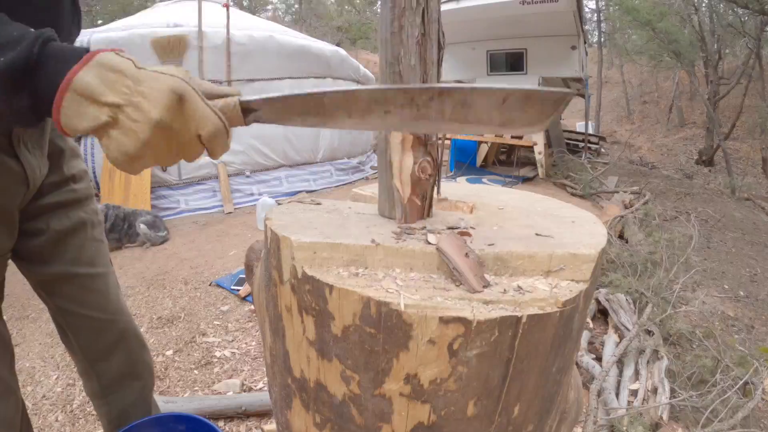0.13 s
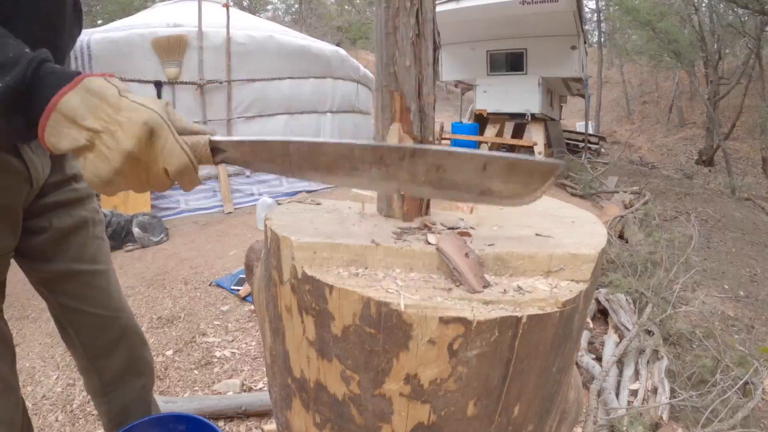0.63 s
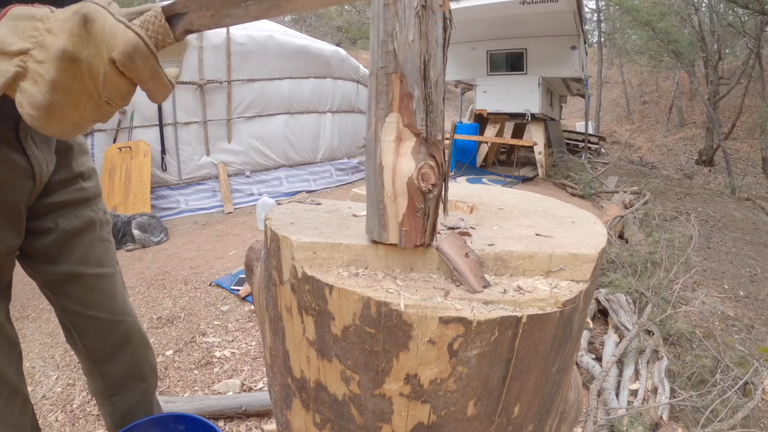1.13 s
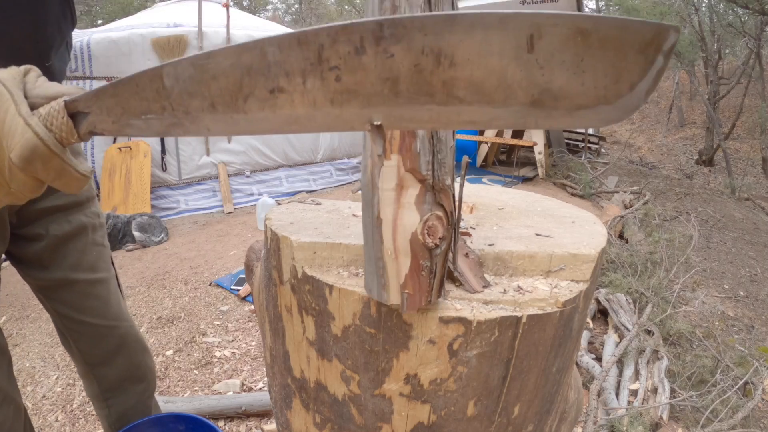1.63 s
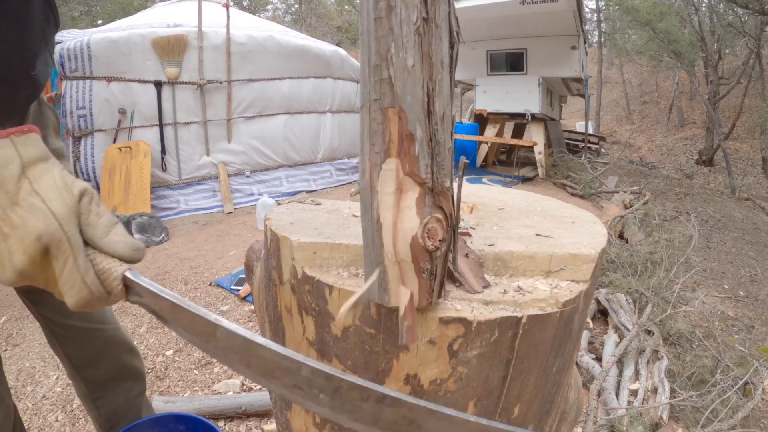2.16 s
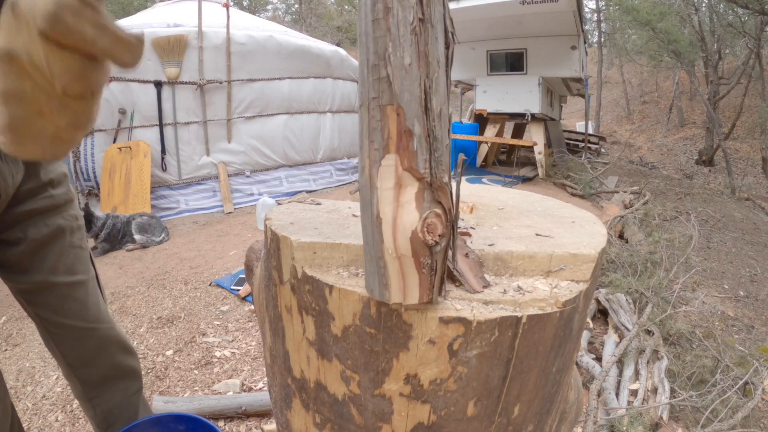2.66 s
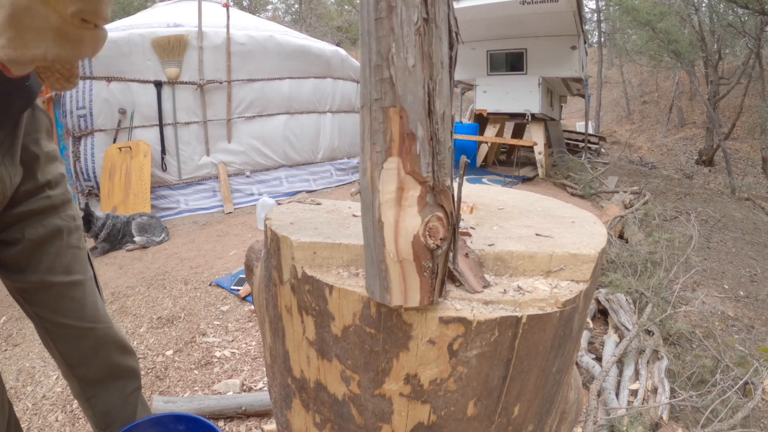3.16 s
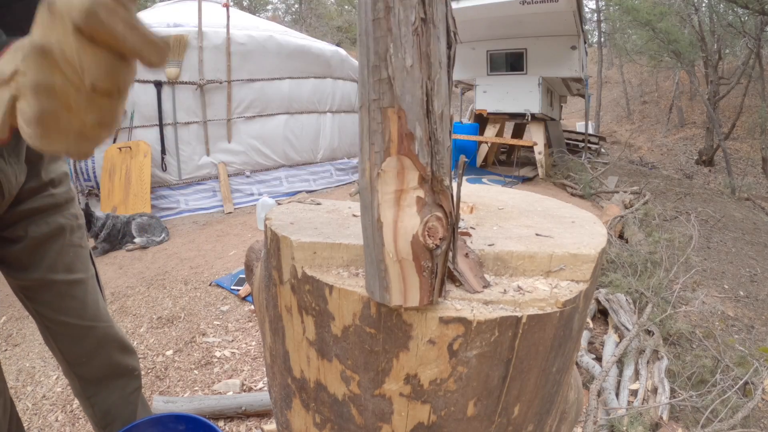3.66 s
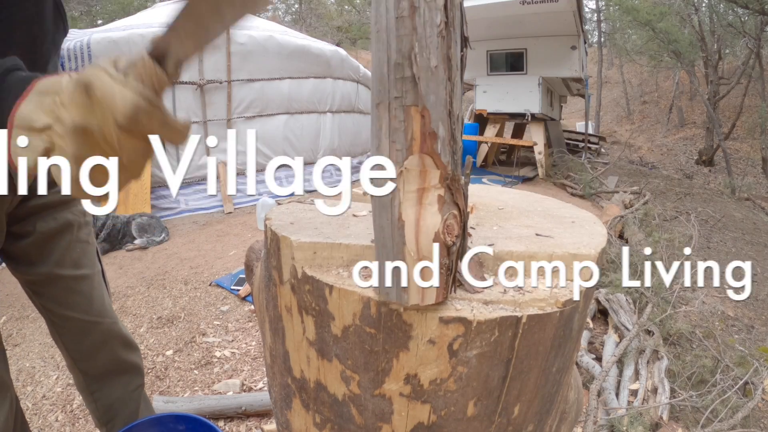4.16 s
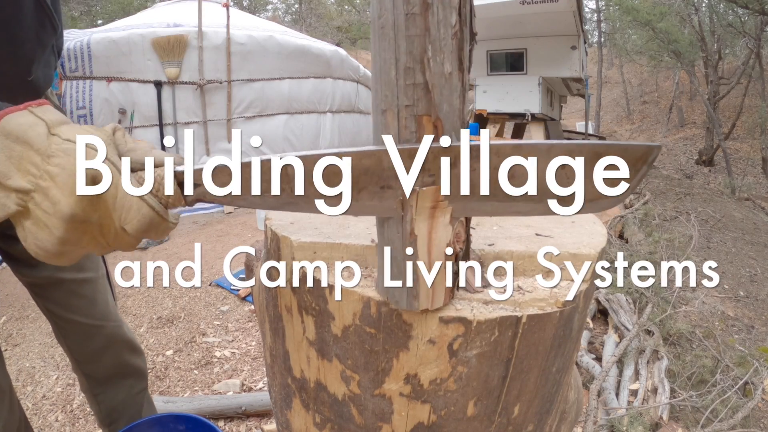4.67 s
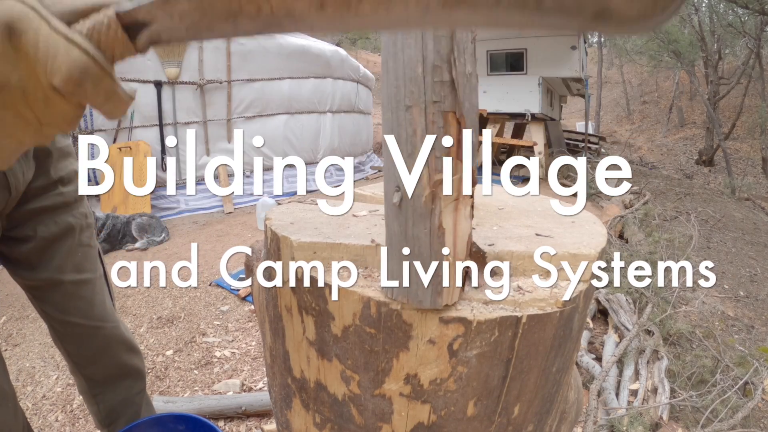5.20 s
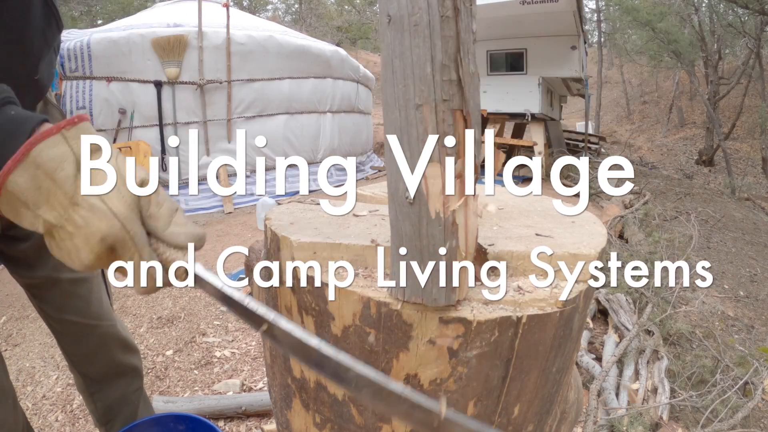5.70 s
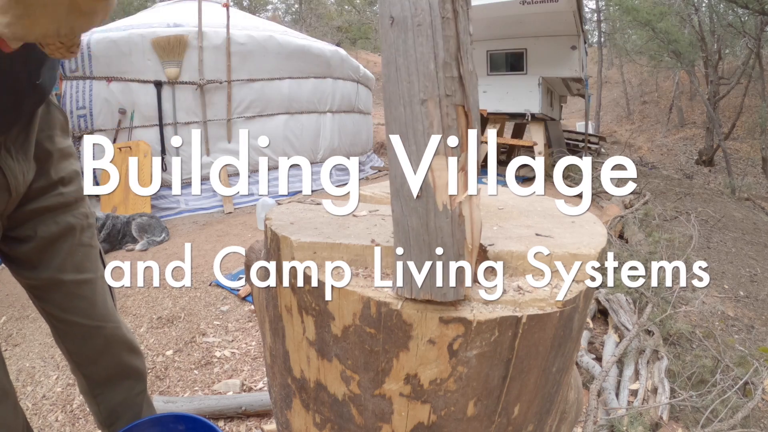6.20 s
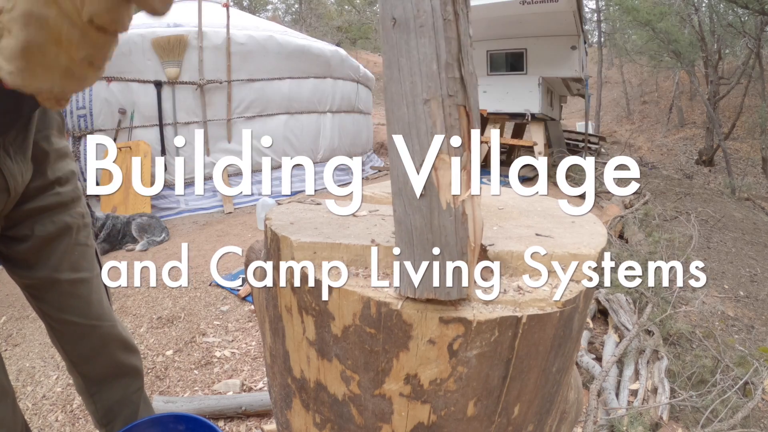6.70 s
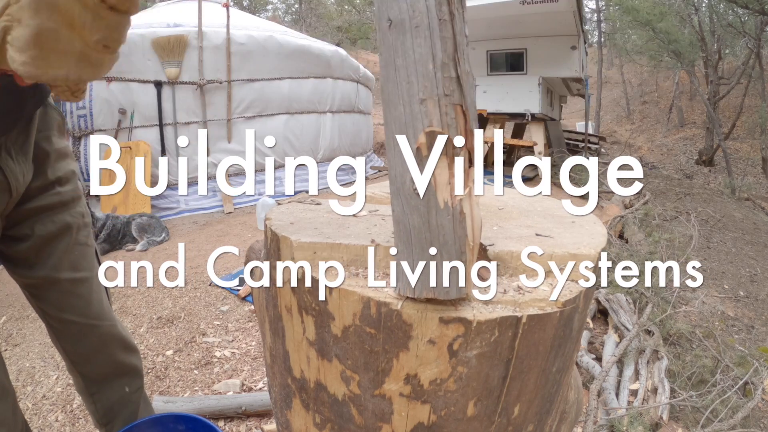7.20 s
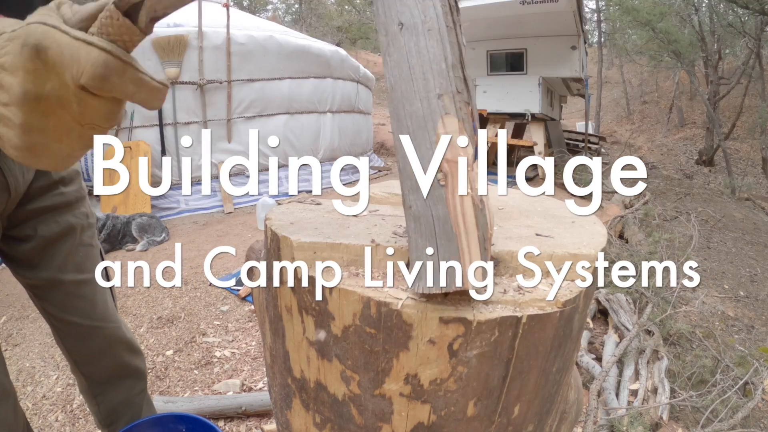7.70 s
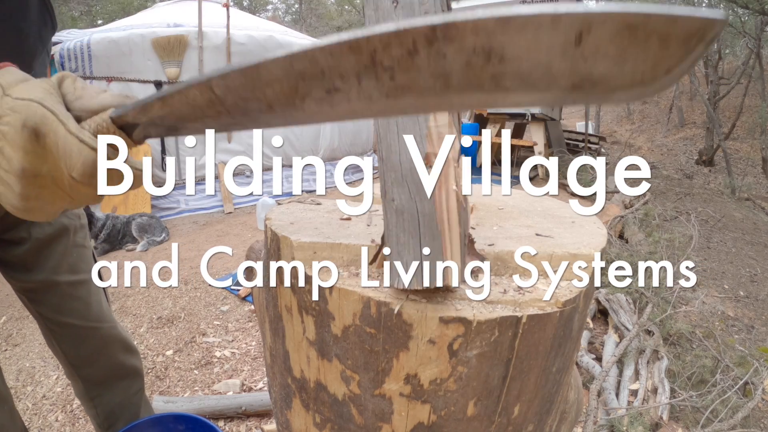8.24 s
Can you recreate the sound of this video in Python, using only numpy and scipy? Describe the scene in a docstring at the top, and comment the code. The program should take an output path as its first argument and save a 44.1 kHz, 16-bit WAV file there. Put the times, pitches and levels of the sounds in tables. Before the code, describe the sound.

Close, irregular machete chops crack into hard wood, chips ticking down between blows, then splintering, a metallic bowl clink and falling debris.

```python
"""First a near-silent moment, then chips tick and bark scrapes: outdoors, close to a small camera with two ports,
a heavy blade chops a small upright log on a stump. Blows ring wood resonances and boom the stump; torn fibres and
soft puffs of sawdust are bursts of spiky noise. Chips patter down, two on a metal bowl (decaying modes); rubbing,
dust and the stuck blade worked loose are grainy noise. Light wind buffets the ports over a quiet forest hush, joined
near 7.75 s by a soft wash of falling debris, all shaped noise."""
import sys
import numpy as np
from scipy import signal
from scipy.fft import rfft, irfft, next_fast_len
from scipy.io import wavfile
from scipy.ndimage import uniform_filter1d, map_coordinates

SR = 44100
rng = np.random.default_rng(int(sys.argv[2]) if len(sys.argv) > 2 else 0)


def linear_from_db(decibels):
    """Turn decibels (scalar or array-like) into linear amplitude factors; 0 gives 1."""
    return 10 ** (np.asarray(decibels, float) / 20)


def transcribe(signal):
    """Save signal, clipped to [-1, 1], as a 16-bit WAV file at the path in sys.argv[1]."""
    frames = np.atleast_2d(signal).T
    limited = np.clip(frames, -1, 1)
    pcm = np.round(limited * 32767).astype(np.int16)
    wavfile.write(sys.argv[1], SR, pcm)


N = 368235

# Wind buffeting at the ports. Each row: time in seconds, level in dB.
WIND = [(.14, -53), (.25, -44.5), (.45, -51.5), (.95, -53), (1.3, -59), (1.5, -49), (2.05, -73), (2.6, -74),
        (3.3, -62), (4.15, -56.5), (4.85, -64.5), (5, -79.5), (5.22, -59.5), (5.45, -74.5), (6.36, -81.5),
        (6.46, -53.5), (6.92, -47.5), (7.4, -66), (7.85, -41.5), (8.2, -50), (8.33, -70)]
# Forest hush all around; near 7.75 s a soft wash of falling debris joins it.
# Each row: time in seconds, level in dB.
HUSH = [(.2, -69.5), (.5, -75.5), (.8, -66.5), (1.2, -76.5), (2.3, -71.5), (3.1, -75), (4.45, -72),
        (4.75, -66), (5, -71.5), (5.9, -69.5), (6.4, -75.5), (7.55, -70.5), (7.75, -52), (8.05, -63)]
# Colour of the buffeting. Each row: frequency in Hz, relative density in dB.
RUMBLE_COLOUR = [(12, -28.5), (22, -5.5), (42, 3), (65, -7.5), (113, -12), (160, -20), (250, -36.5),
                 (500, -120)]
# Colour of the hush. Each row: frequency in Hz, relative density in dB.
HUSH_COLOUR = [(76, -28), (130, -5.5), (269, -5.5), (597, -6.5), (914, -17.5), (2180, -26), (2890, -34),
               (6780, -27), (9000, -28), (11700, -56.5), (19800, -120)]
# What each swing leaves behind. Each row: time of the chop in seconds, draught level in dB, draught length
# in seconds, dust level in dB, fall of the dust in dB per second.
SWINGS = [(0.582, -46.5, 0.17, -56.5, 65.5), (0.997, -50.5, .15, -75.5, 28), (1.605, -52, 0.13, -78, 30.5),
          (2.154, -63.5, 0.15, -52.5, 159), (2.843, -46.5, 0.21, -68, 64.5), (3.376, -48, 0.19, -62.5, 65),
          (3.819, -45, 0.19, -57.5, 83.5), (4.28, -47, 0.21, -62, 21), (5.722, -61.5, 0.12, -46.5, 100.5),
          (6.501, -46, 0.33, -62.5, 62), (7.015, -43.5, 0.15, -69.5, 66), (7.48, -49, 0.2, -50.5, 97)]
# Trees and canvas answering. Each row: frequency in Hz, t60 in seconds.
YARD = [(150, 0.13), (1000, 0.4), (4000, 0.15), (12000, 0.042)]
# Bark scraped, the blade worked loose, cloth, debris sliding. Each row: start in seconds, length in seconds,
# level in dB, brightness in dB (added to the highs, taken from the lows).
SCRAPES = [(.17, 0.28, -67.5, -0.3), (.71, 0.074, -62, -6.5), (2.316, 0.059, -66.5, -7.5),
           (2.435, .27, -74.5, -1.5), (2.928, 0.078, -67.5, -0.5), (3.616, 0.031, -65.5, -5.5),
           (4.12, 0.058, -65.5, -1), (4.466, 0.19, -54, -1.5), (4.674, .22, -56, -3),
           (4.937, 0.05, -78.5, 6), (5.02, .38, -63, -1.05), (5.135, 0.13, -59, 4), (5.891, .14, -66, 5),
           (6.05, .4, -74, 1.5), (7.607, .14, -45.5, -0.5), (7.814, 0.07, -46, -4), (7.977, .06, -63, -3),
           (8.034, 0.18, -58, -4), (8.207, .2, -52.5, 0)]
# Colour of rubbed fibre before the brightness. Each row: frequency in Hz, relative density in dB.
FIBRE_COLOUR = [(410, -41.5), (700, -15.5), (747, -15.5), (1460, -3.5), (2400, -4), (2840, -1.5),
                (6480, -3.5), (7790, -13.5), (12800, -22.5), (16000, -33.5)]
# A split-off piece slides and hums. The row: start in seconds, length in seconds, level in dB,
# frequency in Hz, width in Hz.
SLIDE = (.69, .125, -58, 1370, 280)
# Modes of the metal bowl. Each row: frequency in Hz, level in dB before the hardness, t60 in seconds.
BOWL = [(300.7, -6.5, 0.93), (347, -16, 0.4), (440, -20, 0.3), (876, -7.5, 0.18), (897, -5.5, 0.18),
        (1200, -21, 0.11), (2480, -22, .12), (2820, -10.5, 0.077), (3820, -9, 0.094), (4600, -4, 0.038)]
# Chips landing on the bowl. Each row: time in seconds, level in dB, hardness (modes fade above this Hz).
BOWL_HITS = [(3.625, -46, 545), (7.821, -14, 6170)]
# Chips on other hollow things. Each row: time in seconds, level in dB, frequency in Hz, t60 in seconds.
HOLLOW_NOTES = [(3.514, -49.5, 257, 0.2), (5.93, -51.5, 424, 0.27), (5.93, -53.5, 448, 0.22)]
# The larger chips landing. Each row: time in seconds, peak in dB, centre in Hz.
CHIPS = [(0.1391, -35.5, 4730), (0.189, -16, 4130), (0.2478, -41, 4630), (0.2663, -35.5, 5200),
         (0.3411, -20, 4250), (0.411, -22.5, 8500), (0.683, -35, 1190), (0.7322, -30, 1930),
         (0.9448, -44, 2100), (1.6048, -30.5, 4210), (2.3361, -36, 3490), (2.4399, -34, 2830),
         (2.6199, -34.5, 1760), (3.4674, -27, 3140), (3.5109, -30, 3600), (3.6237, -37.5, 3820),
         (3.636, -40.5, 1500), (3.8786, -31.5, 2960), (3.9554, -34, 3420), (4.0971, -47, 4330),
         (4.119, -45, 4080), (4.1335, -35, 2440), (4.6119, -36.5, 2770), (4.7536, -34.5, 5290),
         (4.8728, -42, 5700), (4.8803, -30.5, 2450), (4.8924, -35.5, 3110), (4.9516, -50, 7040),
         (5.1133, -42.5, 4600), (5.1367, -43, 3080), (5.1984, -34.5, 4110), (5.2719, -35, 4360),
         (5.3747, -35, 4900), (5.4061, -44, 4680), (5.4281, -40, 5090), (5.5672, -46.5, 5300),
         (5.6121, -46.5, 5360), (5.7987, -36.5, 6140), (5.8117, -31.5, 6000), (5.9015, -46, 2790),
         (5.9224, -39, 5960), (5.9289, -26, 5530), (5.9479, -37, 2900), (5.9683, -28.5, 4600),
         (5.9968, -39, 4040), (6.0074, -32, 4720), (6.0591, -41.5, 4120), (6.1594, -48, 3190),
         (6.2108, -49.5, 4710), (6.6737, -41.5, 6970), (6.7635, -36.5, 4200), (6.9536, -42.5, 3080),
         (7.1152, -16, 2960), (7.7867, -26, 2880), (8.0117, -38, 2660), (8.1803, -25, 3400),
         (8.2312, -36.5, 3960)]
# Modes of the blade. Each row: frequency in Hz, level in dB before the hardness, t60 in seconds.
BLADE = [(3420, 3, 0.045), (4360, -4.5, 0.11), (5670, 0.5, 0.063), (15440, -14.5, .07)]
# Cuts that leave the blade free to sing. Each row: time in seconds, level in dB, modes fade above this Hz.
BLADE_RINGS = [(2.1511, -24.5, 3994), (2.8438, -44, 4000), (5.7323, -26, 18210)]
# Fibres tearing, and soft puffs of sawdust and chips falling after the blows.
# Each row: time in seconds, peak in dB, centre in Hz, t60 in seconds.
SNAPS_AND_PUFFS = [(0.5835, -14.5, 3067, 0.014), (0.6013, -9.5, 5900, .018), (0.609, -6.5, 4200, 0.015),
                   (0.6274, -9, 3680, 0.031), (0.633, -14.5, 2332, .02), (0.641, -19, 4600, 0.012),
                   (0.6519, -17.5, 3267, .018), (0.9857, -22, 2344, 0.023), (1.641, -34.5, 3910, 0.0092),
                   (2.1478, -7.5, 1850, 0.035), (2.3435, -28, 3420, .018), (2.8421, -5.5, 1887, .027),
                   (2.9869, -39, 7110, 0.058), (3.3728, -9, 4360, 0.037), (3.3777, -4, 4356, 0.017),
                   (3.381, -8.5, 3338, .01), (3.4572, -23, 7225, 0.038), (3.829, -4, 3122, .018),
                   (3.9428, -32.5, 4670, 0.021), (4.2969, -12.5, 1607, .023), (4.3006, -6.5, 5790, 0.02),
                   (4.3841, -33, 5650, 0.036), (5.186, -32.5, 4207, 0.033), (5.7274, -13.5, 1670, 0.029),
                   (5.7329, -12, 5670, .02), (6.501, -4.5, 1676, .022), (6.6214, -37.5, 5360, 0.096),
                   (7.0168, -6, 5990, 0.023), (7.1241, -24, 2396, 0.04), (7.4754, -22, 1608, 0.015),
                   (7.4874, -4.5, 4076, 0.024), (7.503, -14.5, 4810, .043), (7.5224, -19, 2293, 0.032),
                   (7.5739, -26.5, 4940, 0.021), (7.607, -19, 1840, 0.015), (7.6232, -10, 2923, 0.015),
                   (7.655, -27.5, 5320, 0.042), (7.6742, -18.5, 6790, 0.015), (7.6969, -19.5, 3644, 0.016),
                   (7.7046, -13, 4190, .018), (7.8203, -16, 3830, 0.025), (7.9431, -22.5, 1970, 0.024),
                   (7.9493, -15.5, 1860, .04), (7.9629, -13.5, 2510, 0.027), (7.9744, -24, 2520, .018),
                   (8.1036, -36, 1532, 0.024), (8.1284, -33, 3256, 0.049)]
# Housing colour heard on the snaps, puffs and chips. Each row: frequency in Hz, gain in dB.
CAPSULE = [(1000, 3), (5500, 1.5), (6800, 1.5), (7450, 0), (8000, -6), (10000, -9), (16000, -28)]
# Blows and bumps on the wood. Each row: time in seconds, peak of the log in dB, contact in ms,
# stump boom in dB relative to the blow.
KNOCKS = [(0.4137, -21.5, 1, -40.5), (0.5862, -13, 0.42, -29), (0.6315, -11.5, 0.78, -46),
          (0.9844, -15.5, 1, -45), (1.6046, -11.5, 1, -46), (1.6424, -33, 1, -21),
          (2.1526, -9.5, 0.78, -46.5), (2.843, -6, 0.67, -35.5), (3.3757, -15, 0.5, -27.5),
          (3.8263, -10.5, 0.71, -25.5), (4.297, -10.5, 0.62, -31), (4.8816, -49, 0.54, -18),
          (5.7274, -5, 0.25, -42), (5.7339, -17, 0.26, -42), (5.74, -8.5, 0.82, -54),
          (5.9301, -48.5, 0.3, -21.5), (6.499, -8, 0.93, -35), (7.0146, -8.5, 0.47, -35),
          (7.4757, -5, 0.36, -48), (7.4843, -23, 0.37, -42), (7.607, -20.5, 0.23, -19.5),
          (7.6974, -21, 0.12, -16), (7.9728, -29, 0.55, -16), (8.1788, -37.5, 0.72, -7.5)]
# Resonances of the log, varied from blow to blow. Each row: frequency in Hz, width in Hz, level in dB.
WOOD = [(178, 100, 2), (228, 45, 0), (329, 100, -0.5), (427, 88, -1), (523, 120, -2.5), (615, 16, -1.5),
        (790, 89, -9.5), (960, 140, 0.5), (1272, 140, -8.5), (1500, 600, -5.5), (1850, 140, -8)]
# Modes of the stump. Each row: frequency in Hz, level in dB, t60 in seconds.
STUMP = [(91, -10, 0.25), (133, -1, 0.42), (153, 0.5, 0.3)]
# Balance of the close sounds between the ports. Each row: frequency in Hz, left minus right in dB.
LEAN = [(60, -1), (1000, -.5), (4400, 0), (7000, -2), (9000, -6), (13000, -12)]

OPPOSITE = np.array([[1], [-1]])  # one sign for each port
LEAD_S = .04  # room before a burst for its swell
SWELL_SHARE = 0.23  # time constant of the swell of a snap or puff, as a share of its t60
# Small chips trickle at random: mean gap in s, dB above the rustle, scatter in dB, typical centre in Hz.
CRUMB_EVERY_S, CRUMB_DB, CRUMB_SCATTER_DB, CRUMB_HZ = 0.1, 18, 0.5, 4200
DRAUGHT_RISE_S, DRAUGHT_FALL_S, DUST_BRIGHT_DB = 0.017, .1, -1.5
SCRAPE_RISE_S, SCRAPE_FALL_S, STILL_DB = 0.0081, 0.06, -89
SPREAD_S = .0018  # bending waves in the log: 300 Hz arrives this much after 2 kHz


def unit(x):
    """x at rms 1."""
    return x / np.sqrt(np.mean(x ** 2) + 1e-20)


def along(points, hz):
    """(Hz, value) points read on a log frequency axis."""
    f, v = np.transpose(points)
    return np.interp(np.log(hz + 1), np.log(f + 1), v)


def curves(rows):
    """One value per sample for each column after the time."""
    s, *cols = np.transpose(rows)
    return [np.interp(np.arange(N) / SR, s, c) for c in cols]


def wobble(rate):
    """A smooth random curve, rate knots a second."""
    knots = rng.standard_normal(int(N * rate / SR) + 4)
    return map_coordinates(knots, [np.arange(N) * rate / SR])


def filtered(x, response):
    """x times a complex response of frequency."""
    n = x.shape[-1]
    m = next_fast_len(n + 8192)
    return irfft(rfft(x, m) * response(np.fft.rfftfreq(m, 1 / SR)), m)[..., :n]


def coloured(x, spectrum):
    """x given a (Hz, dB) spectrum, at rms 1."""
    return unit(filtered(x, lambda hz: linear_from_db(along(spectrum, hz))))


def patchy(x, depth_db):
    """x with random patches of gain over time and frequency, at rms 1."""
    z = signal.stft(x, nperseg=512)[2]
    field = uniform_filter1d(rng.standard_normal(z.shape), size=9, axis=0)
    field = uniform_filter1d(field, size=7, axis=1)
    return unit(signal.istft(z * linear_from_db(depth_db * unit(field)), nperseg=512)[1][:N])


def resonance(f, hz, width_hz):
    """One causal resonance, gain 1 at its centre."""
    return 1j * f * width_hz / (hz * hz - f * f + 1j * f * width_hz)


def ring(modes, t, scatter_db, rough_db):
    """Decaying modes, each at a new strength and fluttering as the contact changes."""
    out = 0
    for hz, db, t60 in modes:
        luck = rng.standard_normal(2 + int(t[-1] * 80))  # 80 knots a second
        flutter_db = scatter_db * luck[0] + rough_db * np.interp(t * 80, np.arange(len(luck)), luck)
        out = out + linear_from_db(db + flutter_db - 60 * t / t60) * np.sin(2 * np.pi * hz * t)
    return out


def fading(modes, hard_hz):
    """Modes as a contact of this hardness wakes them: a soft one leaves the high modes asleep."""
    return [(hz, db - 10 * np.log10(1 + (hz / hard_hz) ** 4), t60) for hz, db, t60 in modes]


def hump(start, length, rise, fall):
    """Power that rises, holds for its length and dies away."""
    t = np.arange(N) / SR - start
    onset = np.clip(t / max(rise, .001), 0, 1) ** 2
    return onset * np.exp(-np.clip(t - length, 0, None) / max(fall / 4, .001))


def add(track, s, sound):
    """Mixes a sound into the track at time s."""
    place = track[..., round(s * SR):][..., :sound.shape[-1]]
    place += sound[..., :place.shape[-1]]


def air():
    """Wind and swing draughts differ from port to port; the hush, with its wash of debris, is nearly the same."""
    (buffet_db,), (hush_db,) = curves(WIND), curves(HUSH)
    draught = sum(linear_from_db(db) ** 2 * hump(s, lasts, DRAUGHT_RISE_S, DRAUGHT_FALL_S)
                  for s, db, lasts, _, _ in SWINGS)
    gust, left, right, far, width = rng.standard_normal((5, N))
    lumps = linear_from_db(2.5 * np.array([wobble(9), wobble(9)]))
    buffet = unit(lumps * coloured(np.array([.8 * gust + left, gust + right]), RUMBLE_COLOUR))
    hush = coloured(np.array([far + .3 * width, far - .3 * width]), HUSH_COLOUR)
    stirring_db = 1.5 * wobble(6)
    return np.sqrt(linear_from_db(buffet_db) ** 2 + draught) * buffet + linear_from_db(hush_db + stirring_db) * hush


def yard(x):
    """Scattered answer of trees and canvas: noise in which each frequency dies at its own speed."""
    hz, t, z = signal.stft(rng.standard_normal((2, SR // 2)), SR, nperseg=256)
    decay = linear_from_db(-60 * t / along(YARD, hz)[:, None])
    mid, side = signal.istft(z * decay, SR, nperseg=256)[1]
    tail = np.array([mid + 0.97 * side, mid - 1.4 * side])
    return signal.fftconvolve(x[None], tail / np.linalg.norm(tail[0]), axes=1)[:, :N]


def grit_level():
    """Gain and brightness of the rustle: dust thins out after each chop, scrapes hold for their length."""
    t = np.arange(N) / SR
    parts = []  # (power, brightness in dB)
    for s, _, _, db, fall in SWINGS:
        parts.append(((t > s) * linear_from_db(db - fall * np.abs(t - s)) ** 2, DUST_BRIGHT_DB))
    for s, length, db, bright in SCRAPES:
        parts.append((linear_from_db(db) ** 2 * hump(s, length, SCRAPE_RISE_S, SCRAPE_FALL_S), bright))
    power = linear_from_db(STILL_DB) ** 2 + sum(p for p, _ in parts)
    return np.sqrt(power), sum(p * bright for p, bright in parts) / power


def rustle():
    """Rubbing and dust: dense tiny slips in clumps, with sparse sharper ticks, tilted by the brightness."""
    level, bright_db = grit_level()
    ticks = (rng.random(N) < 250 / SR) * linear_from_db(np.minimum(8 * rng.exponential(size=N), 24))  # 250 a second
    clumps = linear_from_db(1.5 * wobble(40) + 2.5 * wobble(250))
    sharper = np.sqrt(1 + 8 * uniform_filter1d(ticks, size=24))
    slips = rng.standard_normal((2, N)) * clumps * sharper
    grit = patchy(coloured(slips[0], FIBRE_COLOUR), depth_db=2.5)
    high = filtered(grit, lambda f: f ** 4 / (f ** 4 + 3200 ** 4))
    # the rubbing wakes the log's face
    low = filtered(grit - high, lambda f: 0.8 + 0.51 * resonance(f, 1300, 430))
    spread = 0.3 * coloured(slips[1], FIBRE_COLOUR) * OPPOSITE
    return level * (linear_from_db(-bright_db) * low + linear_from_db(bright_db) * high + spread)


def slide():
    """Friction noise in the one resonance of the loose piece."""
    s, length, db, hz, width_hz = SLIDE
    hum = unit(filtered(rng.standard_normal(N), lambda f: resonance(f, hz, width_hz) ** 2))
    return linear_from_db(db) * np.sqrt(hump(s, length, rise=.05, fall=.04)) * hum


def bowl():
    """Chips strike a thin metal bowl and other hollow things; a soft chip wakes only the bowl's low modes."""
    out, t = np.zeros(N), np.arange(SR) / SR
    for s, db, hard_hz in BOWL_HITS:
        modes = fading(BOWL, hard_hz)
        add(out, s, linear_from_db(db) * ring(modes, t, scatter_db=0, rough_db=1.4) * (1 - np.exp(-t / 0.0017)))
    for s, db, hz, t60 in HOLLOW_NOTES:
        add(out, s, ring([(hz, db, t60)], t, scatter_db=0, rough_db=0))
    return out


def burst(hz, t60, swell, spiky_db):
    """Spiky noise swells in, breaks and dies in a few resonances of its own; the ports differ in the treble."""
    t = np.arange(SR // 6) / SR - LEAD_S
    swelling = .25 * np.exp(np.minimum(t, 0) / max(swell, 1e-4))
    shape = np.where(t < 0, swelling, linear_from_db(-60 * t / t60))
    spikes = linear_from_db(spiky_db * rng.standard_normal(len(t) // 12 + 1).repeat(12)[:len(t)])
    narrow_hz = rng.uniform(2200, 8800, size=6)  # each burst has narrow tones of its own

    def piece(f):
        tones = sum(resonance(f, c, 130) for c in narrow_hz)
        body = .4 + resonance(f, hz, .35 * hz) + .9 * tones
        return body * (1j * f / (900 + 1j * f)) ** 2 * linear_from_db(along(CAPSULE, f))

    mid, side = filtered(shape * spikes * rng.standard_normal((2, len(t))), piece)
    side = .5 * filtered(side, lambda f: 1j * f / (5000 + 1j * f))
    return np.array([mid + side, mid - side]) / np.abs(mid).max()


def chips():
    """Chips tick as they land: the larger ones at set times, crumbs at random following the rustle's level."""
    out = np.zeros((2, N))
    luck = rng.standard_normal((50, 3))
    when = 0.35 + np.cumsum(CRUMB_EVERY_S * luck[:, 0] ** 2)
    rustle_db = 20 * np.log10(np.interp(when * SR, np.arange(N), grit_level()[0]))
    crumb_db = rustle_db + CRUMB_DB + CRUMB_SCATTER_DB * luck[:, 1]
    crumbs = np.c_[when, crumb_db, CRUMB_HZ * np.exp(.35 * luck[:, 2])]
    for s, db, hz in [*CHIPS, *crumbs]:
        add(out, s - LEAD_S, linear_from_db(db) * burst(hz, t60=.006, swell=0.00012, spiky_db=7.0))
    return out


def blade():
    """The steel sings briefly where the cut lets it go."""
    out, t = np.zeros(N), np.arange(SR // 2) / SR
    for s, db, hard_hz in BLADE_RINGS:
        add(out, s, linear_from_db(db) * ring(fading(BLADE, hard_hz), t, scatter_db=2, rough_db=3.5))
    return out


def snaps_and_puffs():
    """Fibres tear, and sawdust and chips fall in soft puffs after the blows: bursts that swell in and die."""
    out = np.zeros((2, N))
    for s, db, hz, t60 in SNAPS_AND_PUFFS:
        add(out, s - LEAD_S, linear_from_db(db) * burst(hz, t60, SWELL_SHARE * t60, spiky_db=6.0))
    return out


def dispersed(f):
    """Below 2 kHz low notes travel slower along the wood: the delay goes with one over the root of frequency."""
    low = np.minimum(f, 2000)
    turns = (2 * np.sqrt(low) - low / np.sqrt(2000)) / (300 ** -.5 - 2000 ** -.5)
    return np.exp(-2j * np.pi * SPREAD_S * turns)


def log_response():
    """The log's resonances as one blow finds them: another spot each time, so other levels and pitches."""
    luck = rng.standard_normal((len(WOOD), 2))
    modes = [(hz * (1 + .035 * v), width, linear_from_db(db + 2.5 * u)) for (hz, width, db), (u, v) in zip(WOOD, luck)]
    return lambda f: dispersed(f) * sum(gain * resonance(f, hz, width) for hz, width, gain in modes)


def knocks():
    """A half-sine push and crushing grain ring the log; the stump top throws a little to one side and booms on."""
    out, t = np.zeros((2, N)), np.arange(SR // 2) / SR
    for s, db, contact_ms, boom_db in KNOCKS:
        push = np.sin(np.pi * np.clip(t * 1000 / max(contact_ms, .1), 0, 1))
        crush = .5 * linear_from_db(-60 * t / 0.062) * uniform_filter1d(rng.standard_normal(len(t)), size=8)
        # a long soft contact is dull
        force = filtered(crush - push, lambda f: (1 + 1j * f * contact_ms / 1500) ** -3)
        log = filtered(force, log_response())
        log = log / np.abs(log).max()
        thrown = .06 * np.roll(log, 40) * OPPOSITE  # 40 samples later
        shared, own = (ring(STUMP, t, scatter_db=2.5, rough_db=4) * (1 - np.exp(-t / .006)) for _ in range(2))
        boom = linear_from_db(boom_db) * (shared + 0.47 * own * OPPOSITE)  # partly shaken into the ports through the ground
        add(out, s, linear_from_db(db) * (log + thrown + boom))
    return out


def scene():
    """The chopping reaches the right port a shade earlier and brighter; the sound sets in after a moment."""
    hits = knocks() + snaps_and_puffs() + chips() + bowl() + blade()
    near = hits + linear_from_db(-28.5) * yard(hits.mean(axis=0)) + rustle() + slide()
    lag_s = .8 / SR

    def ports(f):
        balance = linear_from_db(OPPOSITE * along(LEAN, f) / 2)
        return balance * np.exp(-1j * np.pi * f * lag_s * OPPOSITE)

    near = filtered(near, ports)
    fade_db = np.interp(np.arange(N) / SR, [0, .125, .131], [-45, -25, 0])
    return (near + air()) * linear_from_db(fade_db)


def roll_off(x):
    """The treble ends steeply here."""
    return signal.sosfilt(signal.butter(12, 16500, fs=SR, output="sos"), x)


def record(dry):
    """The camera works on blocks: sound leaks ahead as faint copies a block apart, in a haze of treble."""
    block_s = 512 / 48000
    t = np.arange(-SR // 20, SR // 20) / SR
    haze = np.exp(-np.abs(t) / .012) * (np.abs(t) < 3.5 * block_s) * rng.standard_normal((2, len(t)))
    treble = filtered(dry, lambda f: f ** 2 / (f ** 2 + 2500 ** 2))
    smear = signal.fftconvolve(treble, haze / np.linalg.norm(haze[0]), mode="same", axes=1)
    copies_db = [-22, -36, -50]  # one, two and three blocks early
    ahead = filtered(dry, lambda f: sum(linear_from_db(db) * np.exp(2j * np.pi * f * k * block_s)
                                        for k, db in enumerate(copies_db, 1)))
    wet = dry + ahead + linear_from_db(-21) * smear
    capped = wet / (1 + np.abs(wet / .95) ** 6) ** (1 / 6)  # the loudest peaks round off
    return roll_off(capped)


dry = scene()
out = record(dry)
transcribe(out)
```